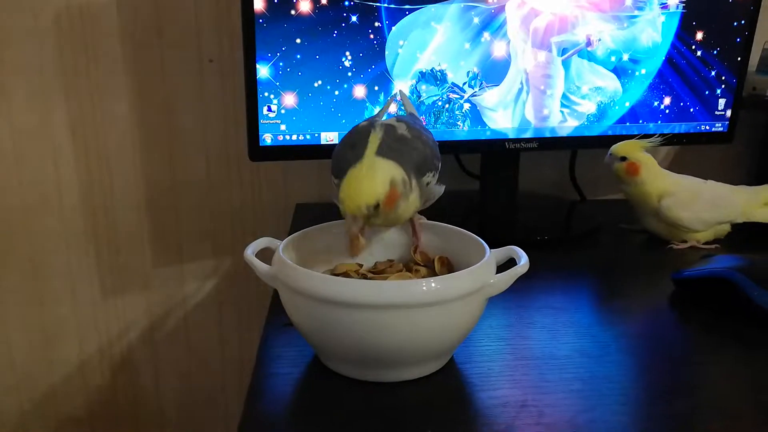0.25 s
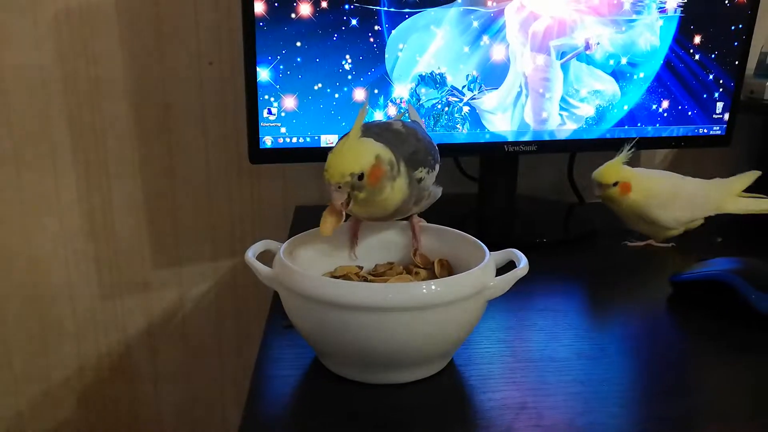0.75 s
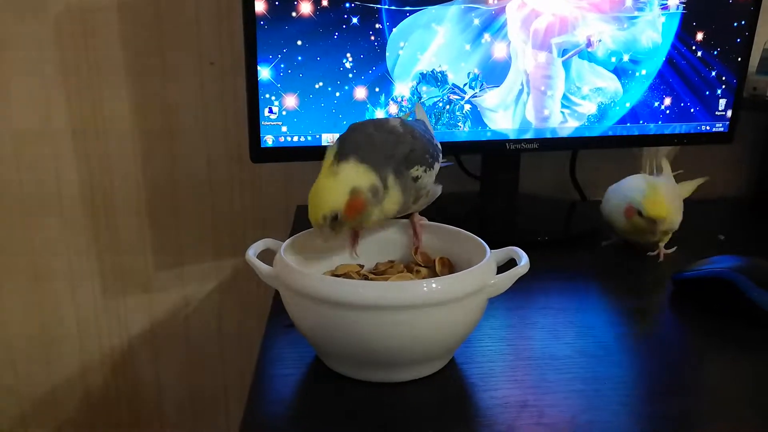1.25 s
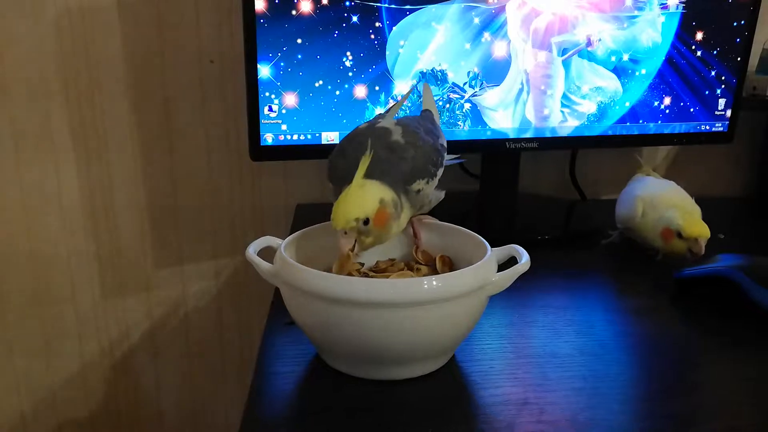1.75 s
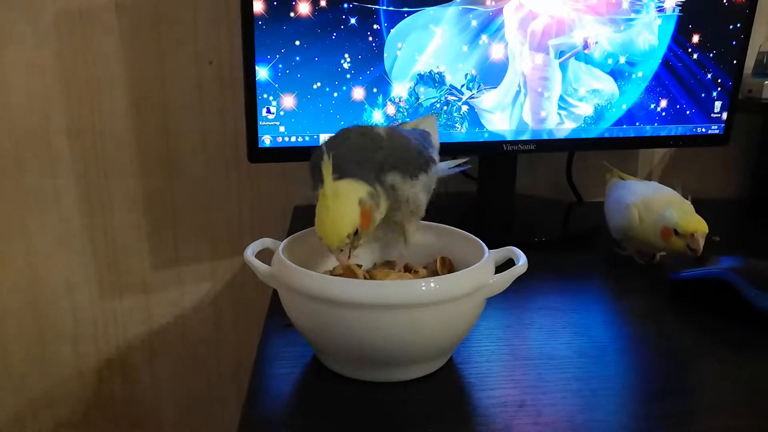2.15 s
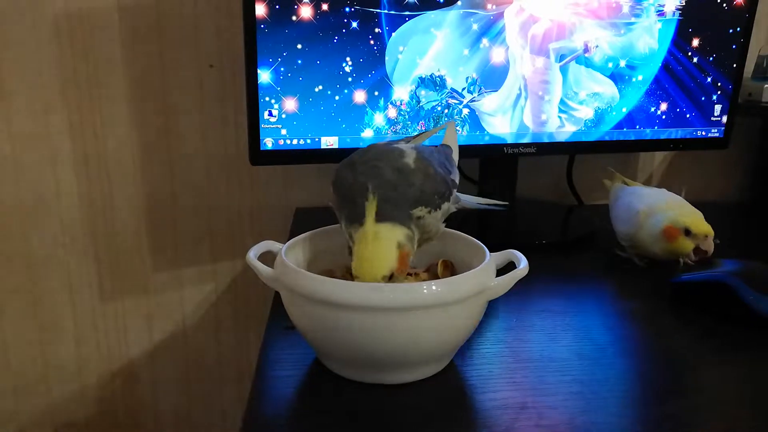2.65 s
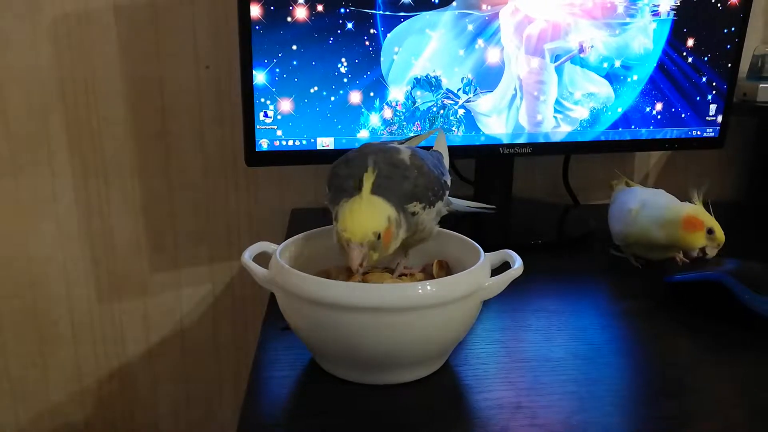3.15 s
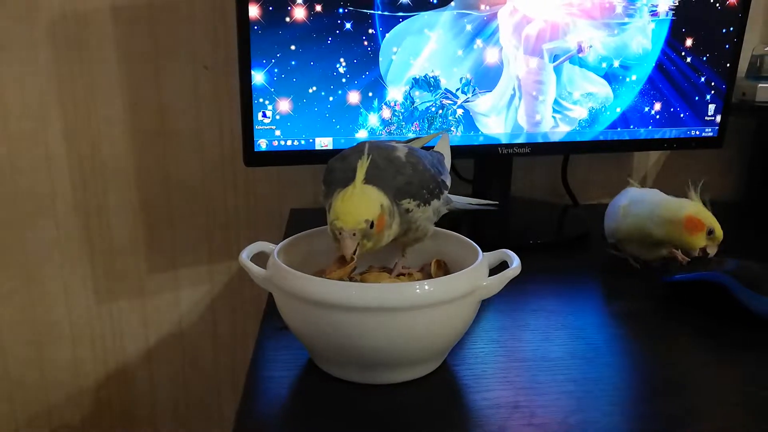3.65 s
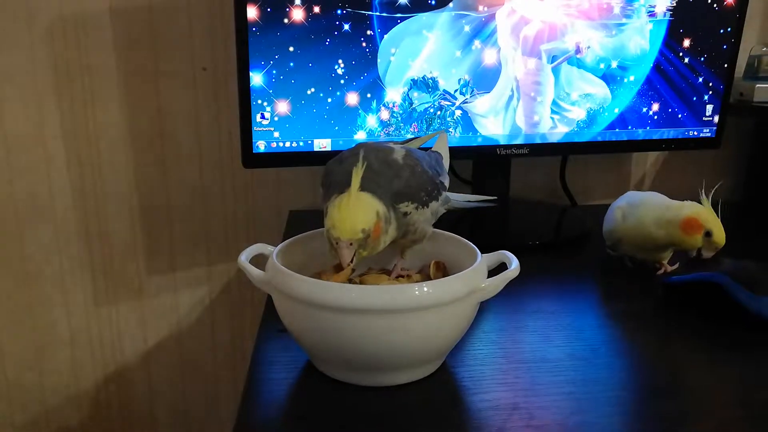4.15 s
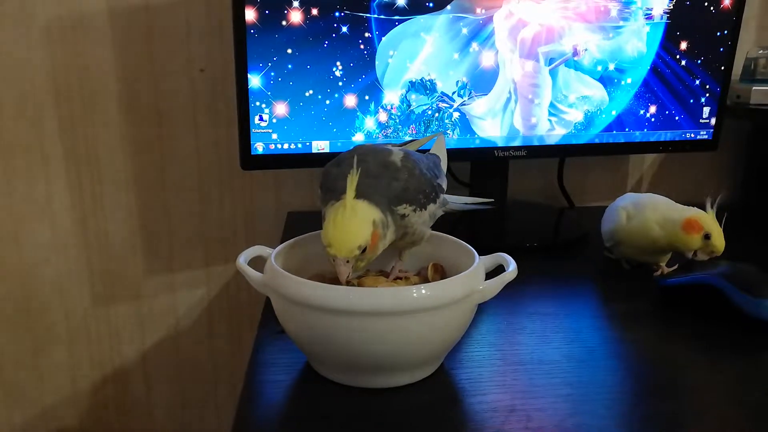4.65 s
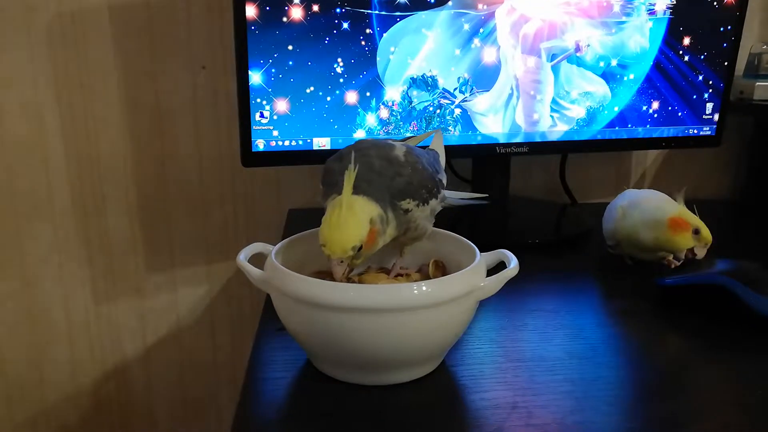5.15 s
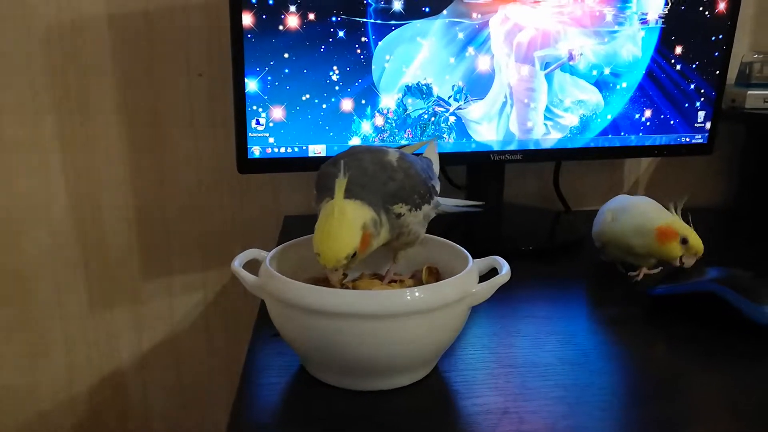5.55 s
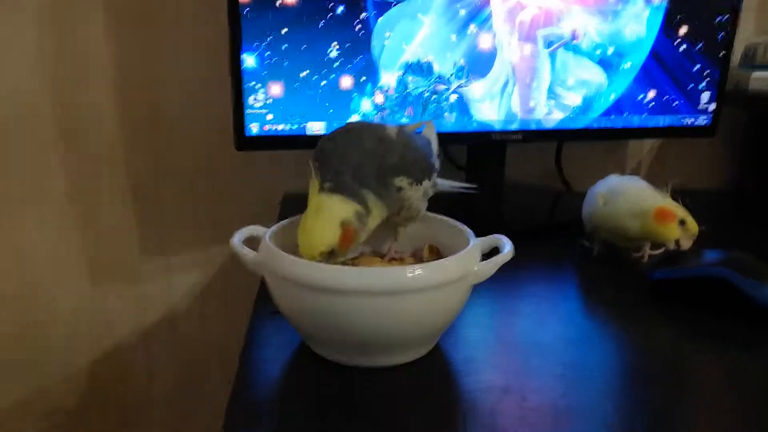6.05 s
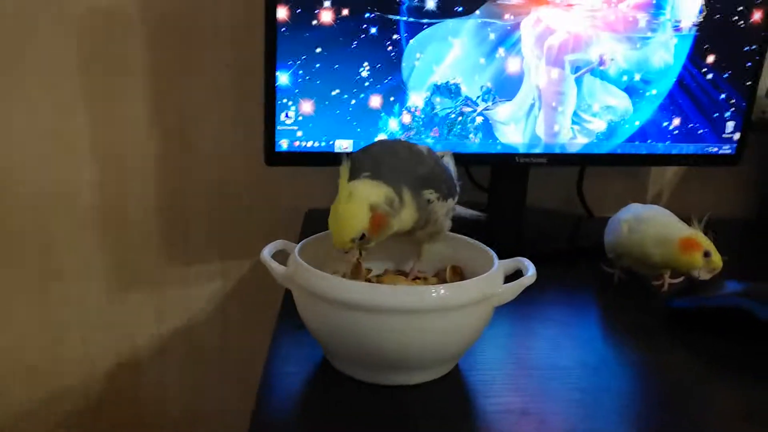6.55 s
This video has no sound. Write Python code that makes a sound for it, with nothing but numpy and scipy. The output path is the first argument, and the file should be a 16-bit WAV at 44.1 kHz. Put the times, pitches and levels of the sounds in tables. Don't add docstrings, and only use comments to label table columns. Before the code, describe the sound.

A small quiet room has soft low air and faint computer fan hum with a very thin high whine. A handheld phone hears the bird bright on the right and its own handling heavy on the left. At 0.1 s several low bumps accompany small flake cracks; another soft thump comes at 0.6. A hard dry crack and beak click snap at 1.2, then light crunches around 1.6. From 2.1 to 2.5 a dense flurry of cracks, gritty rustling and ticks includes a bump at 2.24. Another cluster at 3.05-3.3 has a clear ceramic chink near 3.19. Sparse pecks follow, then crisp ticks and snaps at 4.17-4.65. A dull bump lands at 4.93. From 5.3 to 6.4 the hand regrips loudly: thuds, sharp finger snaps, creaks and scratchy rubs, strongest near 5.7 and 6.3. Rumble and small crunches fade to the end.

```python
import sys
import numpy as np
from scipy import signal
from scipy.fft import rfft, irfft, next_fast_len
from scipy.io import wavfile
from scipy.ndimage import uniform_filter1d, map_coordinates

SR = 44100
rng = np.random.default_rng(int(sys.argv[2]) if len(sys.argv) > 2 else 0)


def gain_from_db(level_db):
    decades = np.asarray(level_db, float) / 20
    return 10 ** decades


def put_to_file(sound):
    columns = np.atleast_2d(sound).T
    safe = np.clip(columns, -1, 1)
    whole_steps = np.round(safe * 32767)
    wavfile.write(sys.argv[1], SR, whole_steps.astype(np.int16))


N = 299880

# (frequency [Hz], density [dB per Hz])
AIR_COLOUR = [(53, -23), (90, -10), (213, -2.5), (259, -8), (729, -16.5), (1690, -23.5), (2010, -25.5),
              (3450, -25), (5310, -28), (10400, -29), (13400, -31), (16000, -37.5)]
ROOM_LIKENESS = [(60, 1), (300, 1), (700, 0.7), (1400, 0.13), (3000, 0), (15000, 0.32)]
# (frequency [Hz], left minus right [dB])
ROOM_TILT = [(100, -1), (380, -0.5), (700, -5.5), (2380, -3.5), (4400, -0.5), (8120, -6), (15000, -11.5)]
# (frequency [Hz], width [Hz], level [dB])
FAN_HUM = [(121.2, 10, -68.5), (162.85, 3.9, -69.5), (209.8, 7.7, -70.5), (300, 7.8, -78),
           (403.6, 6.4, -74)]
# (frequency [Hz], level [dB rms])
FAN_WHINE = [(6002, -82), (8000, -80.5), (10002, -79), (11946, -83)]

# (time [s], level [dB])
SWAY_LEVEL = [
    (0.0, -54),
    (0.3, -59.5),
    (1.68, -63),
    (5.34, -59.5),
    (5.47, -58),
    (5.93, -87),
    (6.1, -41.5),
    (6.8, -56),
]
# (frequency [Hz], level [dB])
SWAY_COLOUR = [(8, -1.0), (25, 10), (60, 2.5), (110, -2.0), (200, -57)]
# (time [s], level [dB])
GRIP_STROKES = [
    [(5.3, -38.5), (5.506, -48.5), (5.75, -47)],
    [(5.87, -52), (6.152, -40), (6.68, -61)],
]
# (frequency [Hz], level [dB])
GRIP_COLOUR = [(15, -32.0), (40, 1.5), (120, -20.0), (300, -14.5), (700, -33.0), (1500, -90)]
# (time [s], peak [dB], pitch [Hz], t60 [s])
FINGER_SLIPS = [(0.0836, -34, 1600, 0.0037), (2.2414, -25.5, 1050, 0.0016), (5.3228, -28, 766, 0.021),
                (5.349, -14.5, 1250, 0.00027), (5.5196, -31.5, 2100, 0.0023), (5.656, -20.5, 1820, 0.00056),
                (5.6584, -17, 860, 0.0017), (5.685, -21, 2210, 0.002), (5.6945, -16, 2420, 0.0013),
                (5.7095, -10, 2220, 0.002), (5.6626, -21, 1330, 0.00033), (5.6898, -8.5, 1780, 0.00052),
                (5.693, -12, 1510, 0.0033), (5.6982, -9, 1000, 0.0036), (5.702, -17, 1750, 0.0065),
                (5.7064, 2, 1320, 0.0012), (5.7105, -11, 3040, 0.0016), (5.719, -14.5, 1460, 0.00064),
                (5.7395, -28, 1300, 0.001), (5.7888, -11.5, 3500, 0.000083), (5.7885, -14, 10100, 0.003),
                (5.36, -38, 1800, 0.0017), (5.8765, -26.5, 3840, 0.00024), (6, -21, 1180, 0.0011),
                (6.0165, -14.5, 2060, 0.00086), (5.95, -36, 5770, 0.002), (5.9504, -28, 1300, 0.002),
                (6.084, -15.5, 2176, 0.00035), (6.09, -26, 3500, 0.0029), (6.11, -37, 2506, 0.001),
                (6.148, -39, 1600, 0.001), (6.159, -33, 1200, 0.00078), (6.217, -33, 1800, 0.0023),
                (6.282, -34, 3000, 0.001), (6.353, -24, 2200, 0.002), (6.357, -22, 2400, 0.002),
                (6.379, -24, 2200, 0.001), (6.4145, -43, 1510, 0.00077), (6.011, -12.5, 2370, 0.0024),
                (6.2952, -11, 2500, 0.0016), (6.24, -42, 6000, 0.0004), (6.383, -25, 4500, 0.0005),
                (6.252, -15, 1640, 0.0013), (6.257, -16.5, 2430, 0.0032), (6.295, -2.5, 1290, 0.0018),
                (6.331, -11.5, 2000, 0.00098), (6.3326, -14, 940, 0.013), (6.3629, -10.5, 2150, 0.0029),
                (6.363, -12, 3330, 0.0022), (6.383, -24.5, 910, 0.0088)]
# (time [s], peak [dB], pitch [Hz])
NAIL_TICKS = [(5.3235, -26, 1900), (5.349, -25.5, 3460), (5.449, -42, 1504), (5.481, -41, 2200),
              (5.508, -39, 1500), (5.678, -30, 5500), (5.686, -25, 4500), (5.694, -19, 4500),
              (5.698, -15, 4200), (5.7045, -21, 5500), (5.716, -21, 5000), (5.72, -23, 7000),
              (5.725, -32, 9000), (5.74, -35, 10000), (5.753, -42, 10000), (5.871, -34, 9500),
              (5.914, -44, 4200), (5.9145, -39, 9500), (5.965, -41, 6500), (6.0175, -22.5, 4500),
              (6.252, -36, 6500), (6.3345, -27, 3500), (6.3795, -33, 3500)]
# (start [s], slips [count], gap [ms], peak [dB], pitch [Hz])
SKIN_CREAKS = [
    (5.681, 2, 5.4, -15.5, 1800),
    (5.785, 1, 4, -24, 10000),
    (5.9192, 5, 8.9, -28.5, 1190),
    (5.9896, 14, 1.6, -24, 1330),
    (5.967, 3, 5.5, -35, 1700),
    (6.0946, 1, 4, -34, 1690),
    (6.344, 4, 5, -26, 2420),
]
# (start [s], peak [s], end [s], level [dB], centre [Hz])
SKIN_RUBS = [(5.335, 5.349, 5.44, -42, 2050), (5.505, 5.545, 5.7, -46, 3500),
             (5.665, 5.706, 5.745, -18, 2000), (5.676, 5.706, 5.745, -26.5, 5570),
             (5.72, 5.787, 5.81, -36.5, 7500), (5.855, 5.872, 6.06, -46, 2500),
             (5.95, 5.978, 6.04, -32.5, 1490), (5.91, 5.95, 6.2, -45.5, 3800),
             (6.15, 6.185, 6.34, -44.5, 1470), (5.982, 6.008, 6.055, -27, 1700),
             (6.02, 6.024, 6.7, -50, 2900), (6.064, 6.084, 6.11, -28.5, 3230),
             (6.08, 6.09, 6.105, -28, 3000), (6.01, 6.022, 6.07, -39, 3000), (6.1, 6.108, 7.1, -54.5, 1740),
             (6.21, 6.255, 6.33, -31, 2220), (6.3, 6.33, 6.46, -38, 2610), (6.335, 6.35, 6.42, -31.5, 2500)]
# (time [s], level [dB], rise [ms])
SHELL_PRESSES = [(0.086, -9, 2.06), (0.101, -18.5, 3.1), (0.122, -15.5, 1.9), (0.1584, -16, 2.5),
                 (3.623, -34, 6.4), (3.653, -28.5, 8.1), (4.926, -14, 13.7), (5.3259, -10, 0.41),
                 (5.4281, -5, 7.4), (5.4472, -11, 7.3), (5.4818, -11, 3.4), (5.5086, -17.5, 1.2),
                 (5.6347, -11.5, 6.3), (5.675, -10, 8.9), (5.704, -8, 1.76), (5.7085, -9.5, 0.45),
                 (5.8805, -13, 6.7), (5.921, -30, 0.57), (5.929, -25, 0.35), (5.9347, -17.5, 0.2),
                 (5.9416, -17.5, 0.42), (5.9441, -17, 0.39), (6.0023, -17, 7.2), (6.012, -18, 4.6),
                 (6.0193, -13.5, 0.97), (6.0248, -13.5, 0.64), (6.038, -20, 5.6), (6.0852, -16.5, 4.9),
                 (6.1, -8, 25), (6.171, -16.5, 8), (6.2745, -23, 2.6), (6.2968, -14, 0.74),
                 (6.327, -22.5, 0.88)]
# (time [s], level [dB], rise [ms])
SHELL_RELEASES = [(0.5903, -15.5, 3.5), (2.2416, -11, 2.7), (2.592, -38.5, 3.06), (3.603, -33, 1.9),
                  (5.3217, -10, 8.9), (5.323, -10.5, 1.15), (5.3565, -25, 2.3), (5.691, -17.5, 0.49),
                  (5.699, -19, 10), (5.708, -13, 0.55), (5.714, -16.5, 6.1), (6.011, -8.5, 0.28),
                  (6.011, -20, 11), (6.0308, -17.5, 2.2), (6.1087, -7.5, 13.4), (6.156, -30, 7.1),
                  (6.239, -20.5, 6), (6.2936, -3, 10.4), (6.295, -10.5, 0.92), (6.38, -26.5, 2.6),
                  (6.4, -25.5, 3), (6.507, -27.5, 4.5), (6.571, -23.5, 7.7), (6.6171, -20.5, 3.6)]
# (frequency [Hz], right against left [dB])
HAND_SHADE = [(150, -0.5), (300, -3.5), (600, -5.5), (1300, -12.5), (2400, -17), (12000, -35)]

# (start [s], peak [s], end [s], level [dB])
CRUMB_RUSTLES = [(0.045, 0.13, 0.37, -50.5), (0.182, 0.186, 0.25, -49), (0.395, 0.42, 0.48, -48),
                 (0.855, 0.873, 0.88, -49.5), (1.351, 1.44, 1.44, -49.5), (1.569, 1.616, 1.62, -45.5),
                 (1.631, 1.64, 1.86, -42), (1.777, 1.82, 2, -52), (1.918, 1.926, 2.06, -49.5),
                 (2.116, 2.125, 1.85, -31), (2.154, 2.163, 2.13, -31), (2.2, 2.22, 2.37, -32),
                 (2.375, 2.4, 2.5, -43), (2.447, 2.46, 2.58, -46), (2.643, 2.68, 2.78, -36.5),
                 (2.774, 2.852, 3.14, -50.5), (2.948, 2.97, 3.05, -44), (3.021, 3.058, 3.43, -43.5),
                 (3.12, 3.14, 3.22, -35.5), (3.187, 3.2, 3.36, -35), (1.19, 1.22, 1.38, -38),
                 (3.575, 3.585, 3.8, -58), (4.295, 4.3, 4.38, -37), (4.462, 4.6, 4.6, -53),
                 (4.563, 4.591, 4.65, -47.5), (4.618, 4.5, 5.04, -45), (5.039, 5.27, 5.4, -53),
                 (5.923, 5.7, 6.2, -51), (6.444, 6.495, 6.47, -41), (6.551, 6.5, 6.65, -44)]
# (start [s], peak [s], end [s], level [dB], centre [Hz])
DUST_SIFTS = [
    (1.2, 1.23, 1.27, -47, 4500),
    (2.2, 2.23, 2.43, -42, 4500),
    (3.19, 3.21, 3.26, -48, 6000),
    (4.175, 4.205, 4.3, -41, 12500),
    (6.24, 6.255, 6.28, -46, 11000),
    (6.333, 6.35, 6.28, -38.5, 11500),
    (6.365, 6.378, 5.7, -52, 11000),
    (6.333, 6.35, 6.375, -40, 5500),
]
# (peak time [s], level [dB], centre [Hz])
BIRD_SHUFFLES = [(0.63, -42, 14800), (0.64, -45, 14200), (7.3, -48, 11600), (1.65, -48, 12000),
                 (6.589, -54, 14000), (0.65, -48.5, 3300), (1.215, -45, 5000), (1.21, -49, 15000),
                 (1.25, -52, 4400), (0.64, -51.5, 4400), (3.2, -43.5, 6500), (4.93, -51, 2500),
                 (1.78, -50, 2800), (1.76, -48.5, 990), (1.93, -45, 910), (2.37, -47.5, 1800),
                 (4.927, -45, 860), (6.592, -49.5, 2700)]
# (time [s], peak [dB])
FLAKE_CRACKS = [(0.1132, -29.5), (0.1823, -21.5), (0.2528, -31.5), (0.6285, -50), (1.1903, -6),
                (1.1982, -12.5), (1.232, -26), (1.6458, -24), (1.693, -31), (1.7866, -29.5), (1.815, -38.5),
                (2.1328, -35), (2.1613, -14.5), (2.1888, -5.5), (2.2425, -16), (2.2638, -20),
                (2.376, -21.5), (2.4484, -18), (3.0548, -20.5), (3.1859, -8.5), (3.269, -22), (4.3137, -24),
                (4.6372, -16), (5.2607, -33), (6.2562, -35), (6.5051, -29), (6.5309, -27)]
# (time [s], peak [dB])
BEAK_SNAPS = [(0.6372, -54), (1.2045, -10), (1.2141, -36), (1.951, -33.5), (2.2476, -16), (2.3709, -26),
              (3.066, -24), (3.474, -36.5), (3.515, -43), (3.534, -32.5), (3.741, -40), (3.915, -35.5),
              (4.1826, -29), (4.223, -20), (4.2759, -25.5), (4.3325, -19), (4.4895, -33), (4.6284, -11),
              (6.175, -35), (6.218, -38), (6.3305, -31), (6.3635, -23), (6.3822, -31)]
# (time [s], peak [dB], centre [Hz])
FLAKE_CRUNCHES = [(1.6034, -31.5, 7900), (1.6163, -28.5, 7800), (2.125, -24, 9700), (2.128, -21, 6900),
                  (2.215, -20.5, 8150), (2.218, -37, 11200), (2.665, -27.5, 8060), (3.134, -29.5, 9800),
                  (3.1422, -29, 7500), (3.1624, -22, 9400), (3.194, -22, 9700), (4.274, -28.5, 7860),
                  (4.3074, -25.5, 8700), (4.330, -26.5, 9200), (4.6502, -33, 7800), (6.6028, -30.5, 7830),
                  (3.531, -34.5, 900), (3.577, -40, 900), (3.983, -37.5, 900)]
# (time [s], peak [dB],
# centre [Hz])
CRUMB_TICKS = [(2.103, -39, 8210), (2.117, -32, 7500), (2.154, -36, 10450), (2.195, -18, 10000),
               (2.199, -28, 5450), (2.272, -27, 6800), (2.329, -45, 11000), (2.350, -32.5, 12100),
               (2.410, -29, 6460), (2.458, -37, 9400), (2.556, -40, 9400), (2.647, -44, 8000),
               (3.032, -38, 9200), (3.040, -42, 9500), (3.050, -31, 10600), (3.094, -36, 5560),
               (3.102, -31, 8500), (3.175, -27, 9450), (3.189, -12, 10600), (3.331, -50, 8400),
               (3.543, -42, 8800), (3.548, -45, 8800), (3.578, -35.5, 9700), (3.579, -34.5, 4800),
               (3.535, -38, 3500), (4.168, -42, 6950), (4.1727, -11, 9160), (1.58, -35, 7000),
               (1.73, -44, 9500), (4.205, -39, 9000), (4.295, -39, 8500), (4.315, -30, 4500),
               (4.328, -28, 10600), (4.332, -21, 4430), (4.423, -41, 9000), (4.432, -43, 9470),
               (4.441, -41, 8500), (4.470, -42, 9500), (4.484, -40, 6490), (4.493, -37, 11100),
               (5.870, -33, 9000), (6.252, -37, 10500), (6.330, -22, 6000), (6.351, -30, 13500),
               (6.362, -26, 12000), (6.379, -35, 10500)]
# (time [s], level [dB], mode the spot favours [Hz], lift [dB])
BOWL_CHINKS = [
    (2.128, -54, 3834, 6),
    (2.156, -50, 3834, 7),
    (2.165, -55, 9733, 10),
    (2.247, -50, 9733, 10),
    (2.248, -54, 3834, 8),
    (3.136, -52, 3834, 6),
    (3.166, -49, 6525, 5),
    (3.186, -28.5, 3834, 4),
    (4.637, -54, 3834, 7),
    (6.578, -63, 2700, 30),
]
# (frequency [Hz], level [dB], t60 [s], beating [per s])
BOWL_MODES = [(1468, -24, 0.4, 3), (2150, -29, 0.2, 4), (3250, -27, 0.2, 6), (3834, -16, 0.45, 4.4),
              (6525, -1, 0.21, 12.5), (8947, -8, 0.2, 14), (9733, -8, 0.17, 11), (10633, -4, 0.2, 17),
              (11210, -12, 0.17, 20), (11600, -10, 0.17, 21), (11900, -10, 0.17, 15)]
# (frequency [Hz], width [Hz], level [dB])
BOWL_HOLLOW = [(3820, 770, -7.5), (6500, 1100, -7.5), (8400, 740, -12), (10020, 2770, -3)]
# (frequency [Hz], t60 [s])
ROOM_DECAY = [(1000, 0.93), (5000, 0.26), (10000, 0.32), (15000, 0.41)]
# (frequency [Hz], left against right [dB])
BIRD_SHADE = [(300, 10.5), (700, -40), (2400, -9), (4400, -23.5), (8000, -41), (15000, -40)]

PORT_LAG_S = 26 / 44100
SNAP_T60_S, CRACK_T60_S, CRUNCH_T60_S, TICK_T60_S = 0.0023, 0.0071, 0.021, 0.0033
SHARP_RISE_S, TICK_RISE_S, CRUNCH_RISE_S = 0.0001, 0.00033, 0.0014
SNAP_HZ, CRACK_HZ = 9700, 8630
BRIGHTER_HZ_PER_DB, PITCH_SCATTER = 71, 0.031
SHARP_EDGE, SOFT_EDGE = 1.526, 1.22


def unit(x):
    return x / np.sqrt(np.mean(x ** 2) + 1e-20)


def along(points, hz):
    f, v = np.transpose(points)
    return np.interp(np.log(hz + 1), np.log(f + 1), v)


def curve(rows, column):
    rows = np.array(rows)
    return np.interp(np.arange(N) / SR, rows[:, 0], rows[:, column], -120, -120)


def wobble(rate):
    knots = rng.standard_normal(int(N * rate / SR) + 4)
    return map_coordinates(knots, [np.arange(N) * rate / SR])


def filtered(x, response):
    m = next_fast_len(N + SR // 2)
    return irfft(rfft(x, m) * response(np.fft.rfftfreq(m, 1 / SR)), m)[..., :N]


def peak(f, hz, width_hz):
    return 1j * f * width_hz / (hz * hz - f * f + 1j * f * width_hz + 1e-9)


def hump(f, hz, breadth, edge):
    u = f / (edge * hz)
    return peak(f, hz, breadth * hz) ** 2 / (1 - u * u + 1.2j * u) ** 4


def add(track, s, sound):
    track[round(s * SR):][:len(sound)] += sound


def gritty(spectrum, spread_db, clump_db, rate):
    sizes = gain_from_db(spread_db * rng.exponential(size=N) + clump_db * wobble(rate))
    return unit(filtered(sizes * rng.standard_normal(N), lambda f: gain_from_db(along(spectrum, f))))


def patchy(x, depth_db, bands, steps):
    z = signal.stft(x, nperseg=128)[2]
    field = uniform_filter1d(rng.standard_normal(z.shape), size=bands, axis=0)
    field = uniform_filter1d(field, size=steps, axis=1)
    gain = gain_from_db(depth_db * unit(field) - depth_db ** 2 / 9)
    return signal.istft(z * gain, nperseg=128)[1][:N]


def swells(rows, breadth, edge, skirt, spread_db, rise_db, fall_db, clump_db, patch_db):
    track = np.zeros(N + SR)
    clumps = np.pad(clump_db * wobble(70), (0, SR))
    after = np.arange(16384) / SR
    f = np.fft.rfftfreq(len(after), 1 / SR)
    for start, top, end, db, hz in rows:
        t = start + after
        sizes = gain_from_db(spread_db * np.minimum(rng.exponential(size=len(t)), 5))
        colour = hump(f, hz, breadth, edge) + skirt * hump(f, 0.543 * hz, 1.0, 2.03)
        grains = unit(irfft(rfft(sizes * rng.standard_normal(len(t))) * colour))
        shape_db = np.interp(t, [start, top, end], [rise_db, 0, fall_db])
        shape_db = shape_db + clumps[round(start * SR):][:len(t)]
        fade = np.clip(np.minimum(after / 0.0045, (end - t) / 0.018), 0, 1)
        add(track, start, grains * gain_from_db(db + shape_db) * fade)
    return patchy(track[:N], patch_db, bands=3, steps=7)


def far_port(x, shade, lag):
    def response(f):
        log_gain = np.log(gain_from_db(along(shade, f)))
        mirrored = np.r_[log_gain, log_gain[-2:0:-1]]
        phase = -signal.hilbert(mirrored).imag[:len(f)]
        return np.exp(log_gain + 1j * phase - 2j * np.pi * f * lag)
    return filtered(x, response)


def background():
    def ports(f):
        turn = np.arccos(np.clip(along(ROOM_LIKENESS, f), -1, 1)) / 2
        return np.array([np.cos(turn), np.sin(turn)])
    white = rng.standard_normal((2, N))
    air = gain_from_db(-58.5) * unit(filtered(white, lambda f: gain_from_db(along(AIR_COLOUR, f))))
    hum = sum(gain_from_db(db) * unit(filtered(white, lambda f: peak(f, hz, w) ** 2)) for hz, w, db in FAN_HUM)
    mid, side = filtered(air + hum, ports)
    t = np.arange(N) / SR
    whine = sum(gain_from_db(db + 0.52 * wobble(2.3)) * np.sin(2 * np.pi * hz * t) for hz, db in FAN_WHINE)
    left_tilt = [(hz, db / 2) for hz, db in ROOM_TILT]
    right_tilt = [(hz, -db / 2) for hz, db in ROOM_TILT]
    left = far_port(mid + side + 0.25 * whine, left_tilt, 1.07 * PORT_LAG_S)
    right = far_port(mid - side + whine, right_tilt, 0)
    return gain_from_db(1.04 * wobble(2.166)) * np.array([left, right])


def sway():
    rumble = gritty(SWAY_COLOUR, spread_db=2.5, clump_db=3.5, rate=6.5)
    return gain_from_db(curve(SWAY_LEVEL, column=1) + 2.5) * rumble


def rustles():
    crumbs = [(*row, 8570) for row in CRUMB_RUSTLES]
    shuffles = [(s - 0.03, s, s + 0.13, db, hz) for s, db, hz in BIRD_SHUFFLES]
    return gain_from_db(-5) * swells(DUST_SIFTS + crumbs + shuffles, breadth=1.0, edge=1.31, skirt=0.39, spread_db=4.0,
                            rise_db=-7.5, fall_db=-24.0, clump_db=3, patch_db=3.5)


def slips():
    track, t = np.zeros(N + SR), np.arange(2048) / SR
    f = np.fft.rfftfreq(len(t), 1 / SR)
    nails = [(*row, 0.0013) for row in NAIL_TICKS]  # t60, s
    for s, db, hz, t60 in FINGER_SLIPS + creaks() + nails:
        ring = -np.sin(2 * np.pi * hz * t) * gain_from_db(-60 * t / t60) * (1 - np.exp(-6.5 * hz * t)) ** 2
        ring = irfft(rfft(ring) / (1 + 1j * f / (2.8 * hz)) ** 3)
        edge = rng.standard_normal(len(t)) * gain_from_db(-60 * t / (1.86 * t60))
        colour = hump(f, 1.53 * hz, 0.85, 2.15) + 0.00003 / t60 * hump(f, 10800, 0.34, 0.56)
        edge = irfft(rfft(edge) * colour)
        snap = 0.64 * ring / np.abs(ring).max() + 0.11 * edge / np.abs(edge).max()
        add(track, s, gain_from_db(db + 2.5) * snap)
    return track[:N]


def bumps():
    track, t = np.zeros(N + SR), np.arange(16384) / SR
    presses = [(*row, -1) for row in SHELL_PRESSES]
    releases = [(*row, 1) for row in SHELL_RELEASES]
    for s, db, rise_ms, way in presses + releases:
        u = 1000 * t / rise_ms
        add(track, s, way * gain_from_db(db) * u * np.exp(1 - u) * (1 - np.exp(-6 * u)))

    def bass_cut(f):
        highpass = 1j * f / 90 * 1j * f / (1j * f + 45)
        return peak(f, 83.6, 64.4) * highpass / (1 + 1j * f / 4000) ** 2
    return filtered(track[:N], bass_cut)


def bites():
    sharp = []
    for rows, centre, t60 in [(BEAK_SNAPS, SNAP_HZ, SNAP_T60_S), (FLAKE_CRACKS, CRACK_HZ, CRACK_T60_S)]:
        for s, db in rows:
            hz = centre + BRIGHTER_HZ_PER_DB * (db + 21.5)
            hz = hz * (1 + PITCH_SCATTER * rng.standard_normal())
            sharp.append((s, db, hz, t60, SHARP_RISE_S))
    ticks = [(*row, TICK_T60_S, TICK_RISE_S) for row in CRUMB_TICKS]
    crunches = [(*row, CRUNCH_T60_S, CRUNCH_RISE_S) for row in FLAKE_CRUNCHES]
    return sharp + ticks + crunches


def beak():
    track, t = np.zeros(N + SR), np.arange(2048) / SR
    f = np.fft.rfftfreq(len(t), 1 / SR)
    body = 0.14 * peak(f, 4080, 5100) ** 2
    jaw = gain_from_db(-20) * peak(f, 1400, 1500)
    for s, db, hz, t60, rise in bites():
        burst = rng.standard_normal(len(t)) * gain_from_db(-60 * t / (1.44 * t60)) * (1 - np.exp(-t / rise))
        if rise > SHARP_RISE_S:
            flake = hump(f, hz, 0.48, SOFT_EDGE) + 0.65 * 3 * peak(f, hz, 0.036 * hz)
        else:
            flake = hump(f, hz, 0.48, SHARP_EDGE)
        burst = irfft(rfft(burst) * (flake + body + jaw))
        add(track, s, gain_from_db(db - 2.5) * burst / np.abs(burst).max())
    return track[:N]


def room(x):
    wet = np.zeros(N + SR)
    for start in range(0, N, SR // 3):
        hz, t, z = signal.stft(rng.standard_normal(SR // 2), SR, nperseg=256)
        decay = gain_from_db(-60 * t / along(ROOM_DECAY, hz)[:, None])
        tail = signal.istft(z * decay, SR, nperseg=256)[1]
        echo = signal.fftconvolve(x[start:start + SR // 3], tail / np.linalg.norm(tail))
        add(wet, start / SR + .004, echo)
    return wet[:N]


def bowl():
    track, t = np.zeros(N + SR), np.arange(SR // 5) / SR
    settle = np.clip((0.19 - t) / .02, 0, 1)
    for s, db, favoured, lift_db in BOWL_CHINKS:
        for hz, level, t60, beat in BOWL_MODES:
            pair = np.sin(2 * np.pi * hz * t) + 0.9 * np.sin(2 * np.pi * (hz + beat) * t)
            lift = lift_db * (abs(hz - favoured) < 560)
            fading = gain_from_db(db + level + lift + rng.normal(0, 1) - 60 * t / t60)
            add(track, s, fading * pair * (1 - np.exp(-t / 0.00031)) * settle)
    return patchy(track[:N], 4, bands=5, steps=4)


def grip():
    strokes = sum(gain_from_db(curve(stroke, column=1)) for stroke in GRIP_STROKES)
    return gain_from_db(-2) * strokes * gritty(GRIP_COLOUR, spread_db=4.0, clump_db=-2.5, rate=63)


def rubbing():
    return gain_from_db(-5.5) * swells(SKIN_RUBS, breadth=1.42, edge=2.42, skirt=1.28, spread_db=5.5,
                              rise_db=-18.0, fall_db=-39, clump_db=1.25, patch_db=3)


def creaks():
    rows = []
    for s, count, gap_ms, db, hz in SKIN_CREAKS:
        for k in range(round(count)):
            uneven_db = db + 2.5 * rng.standard_normal()
            rows.append((s + k * gap_ms / 1000, uneven_db, hz, 0.67 / hz))
    return rows


def hand():
    near = sway() + slips() + bumps() + grip() + rubbing()
    return np.array([near, far_port(near, HAND_SHADE, 0.84 * PORT_LAG_S)])


def bird():
    hits, ring = beak(), bowl()
    near = hits + ring + gain_from_db(-7.5) * room(hits + 0.34 * ring) + rustles()

    def hollow(f):
        return 0.64 + sum(gain_from_db(db) * peak(f, hz, w) for hz, w, db in BOWL_HOLLOW)
    near = gain_from_db(-3) * filtered(near, hollow)
    return np.array([far_port(near, BIRD_SHADE, 0.877 * PORT_LAG_S), near])


def scene():
    return background() + hand() + bird()


def low_pass(x):
    return signal.sosfilt(signal.butter(12, 16510, fs=SR, output="sos"), x)


def record(dry):
    soft = dry / (1 + np.abs(dry / .95) ** 6) ** (1 / 6)
    mix = filtered(soft, lambda f: 1 / (1 + (f / 15900) ** 100))
    return low_pass(mix)


dry = scene()
out = record(dry)
put_to_file(out)
```